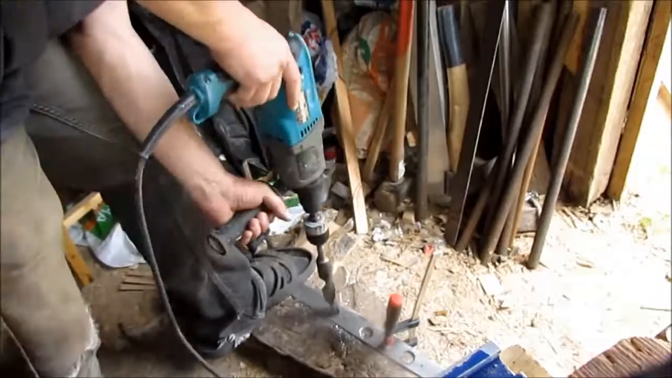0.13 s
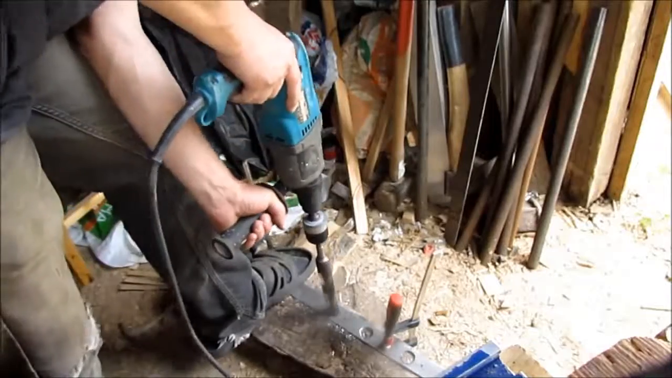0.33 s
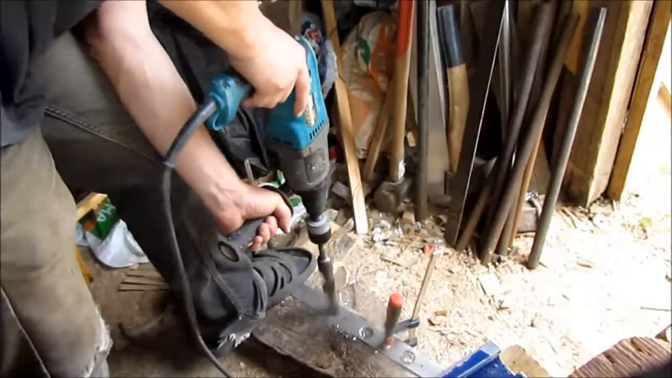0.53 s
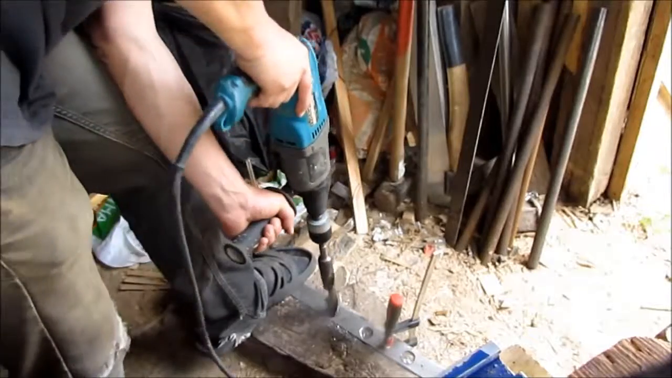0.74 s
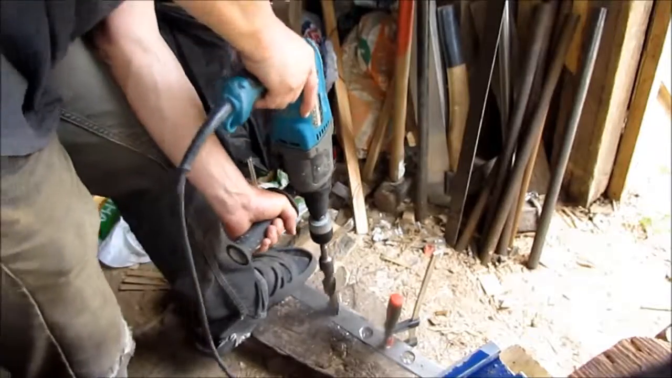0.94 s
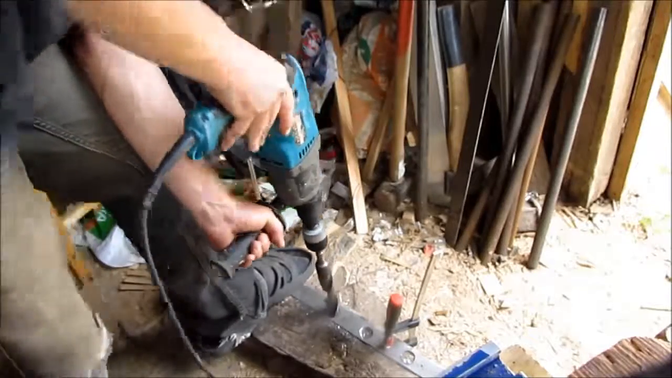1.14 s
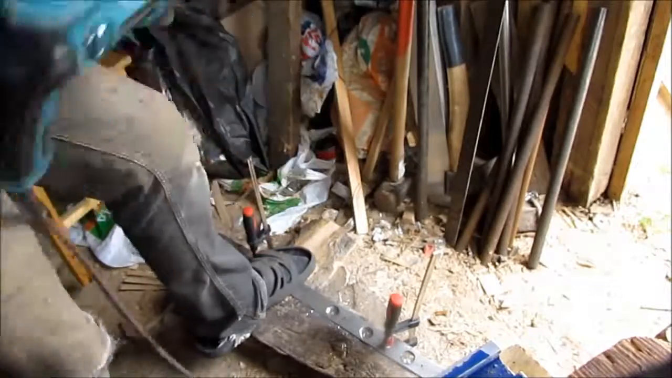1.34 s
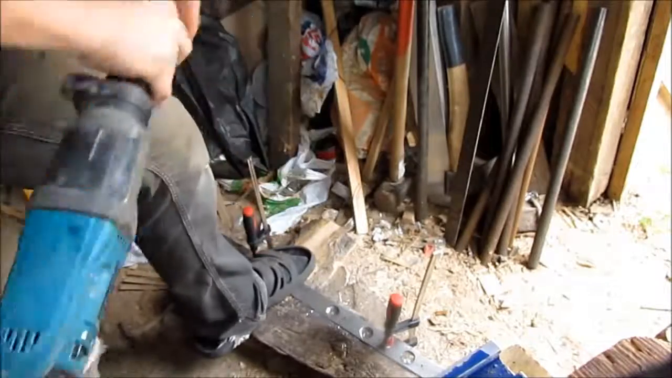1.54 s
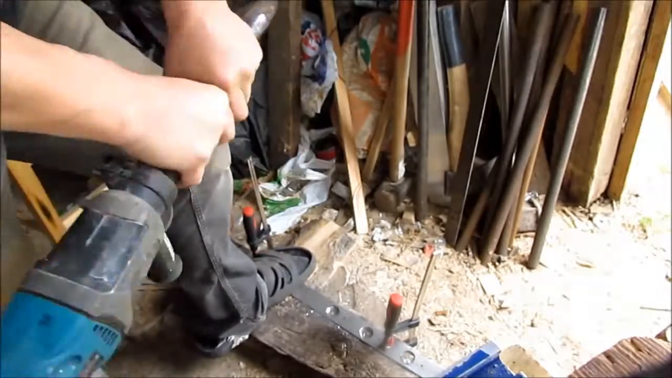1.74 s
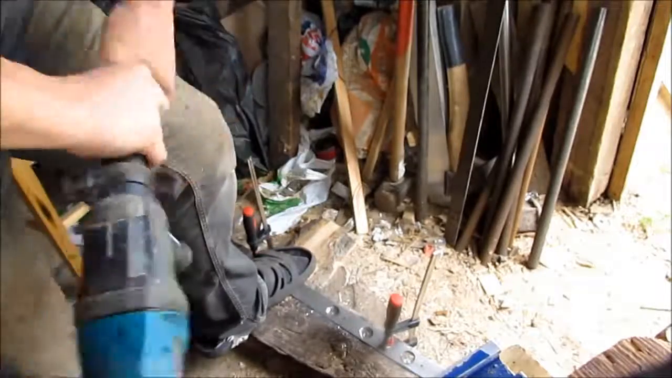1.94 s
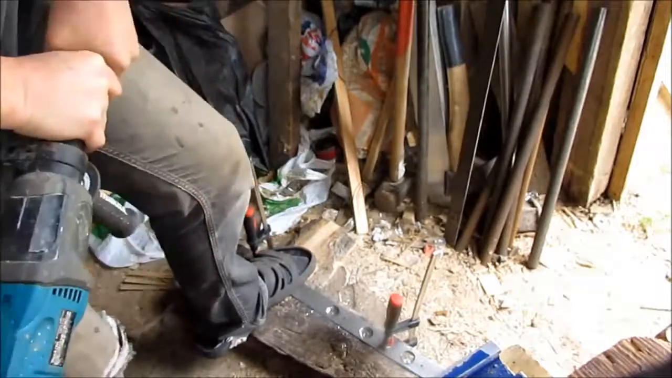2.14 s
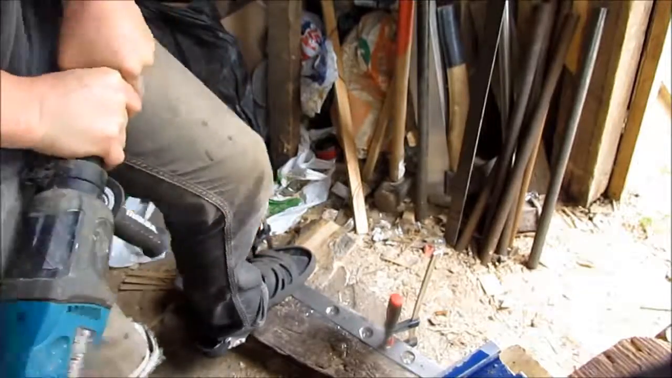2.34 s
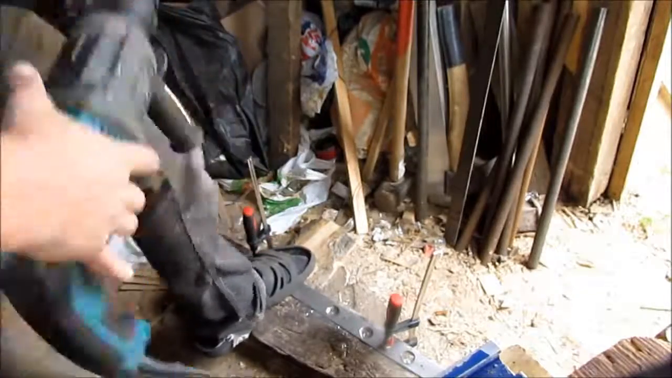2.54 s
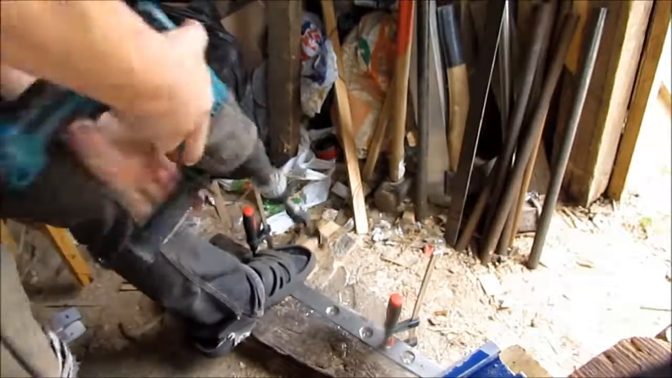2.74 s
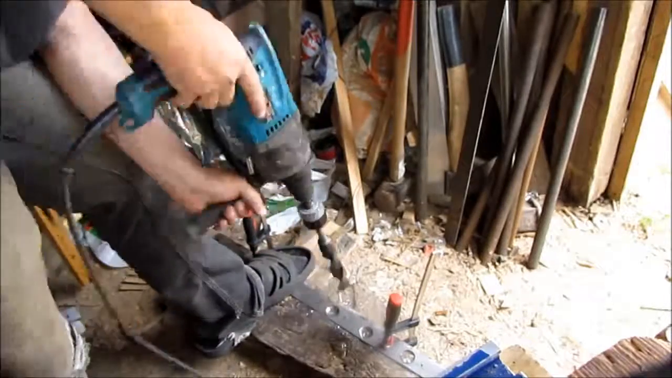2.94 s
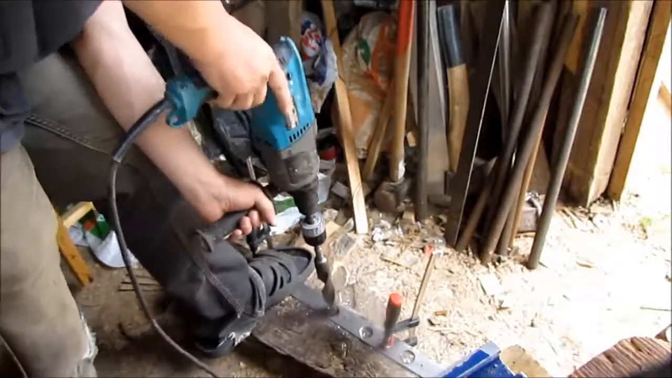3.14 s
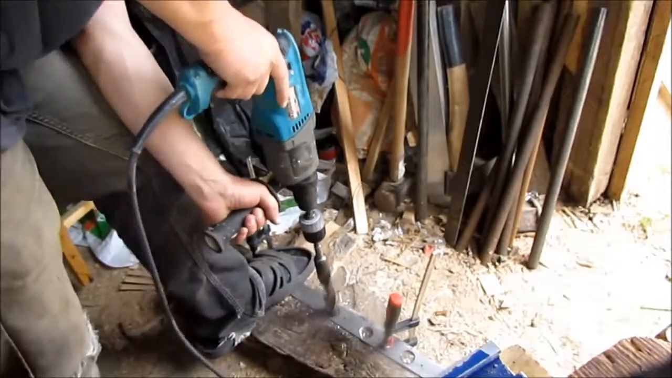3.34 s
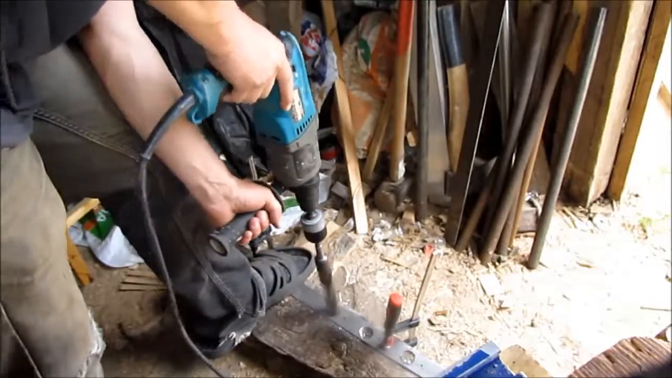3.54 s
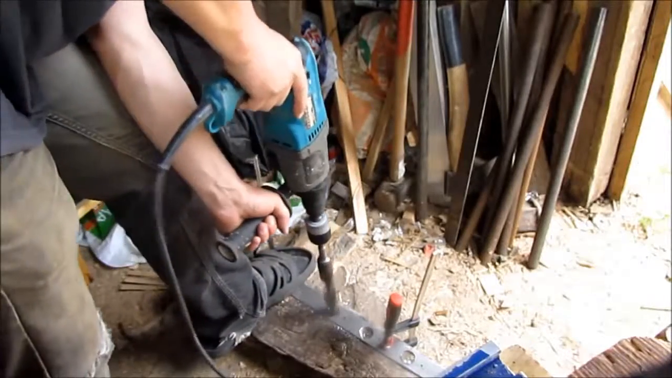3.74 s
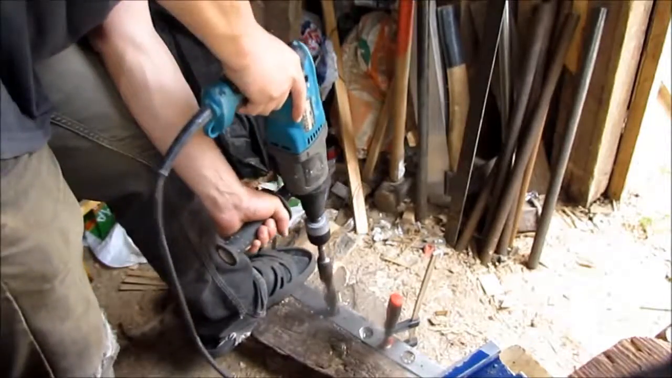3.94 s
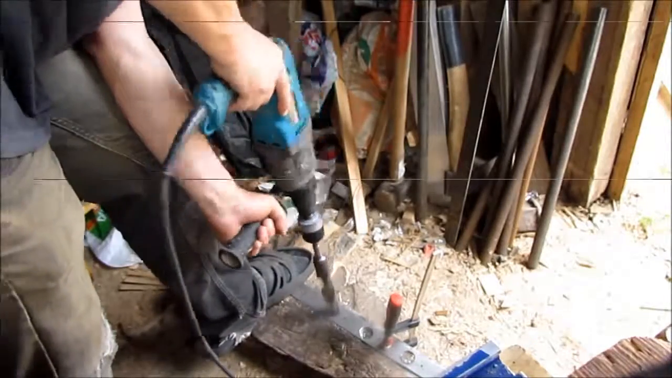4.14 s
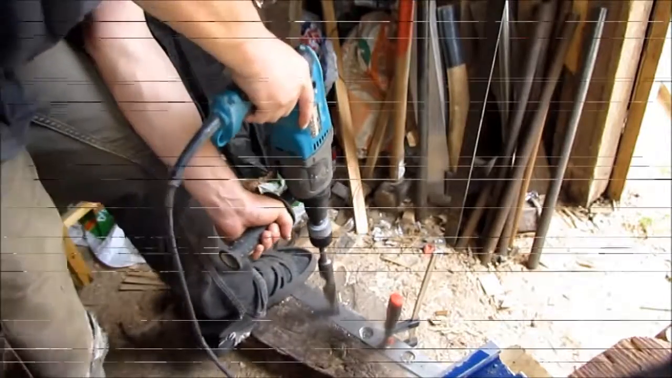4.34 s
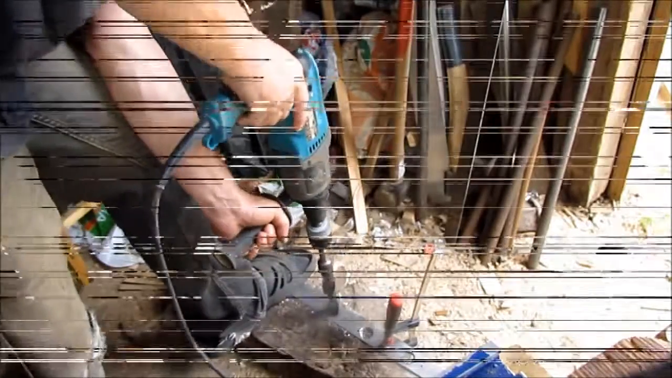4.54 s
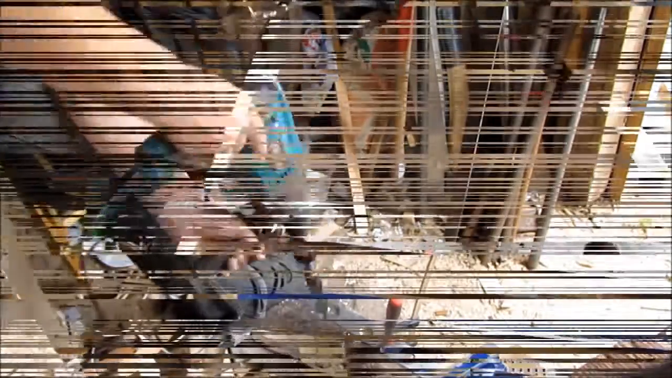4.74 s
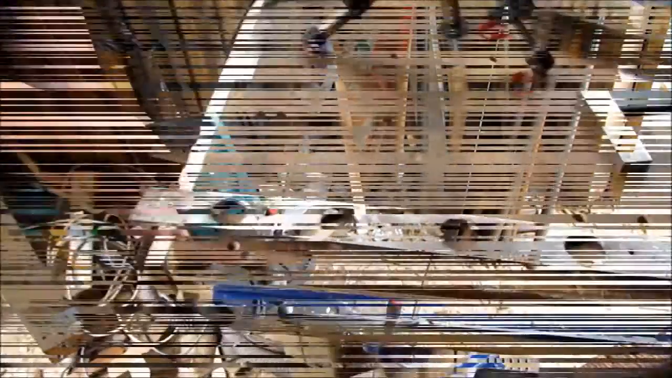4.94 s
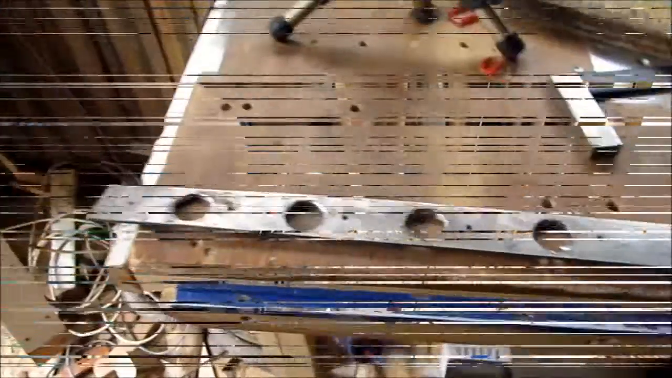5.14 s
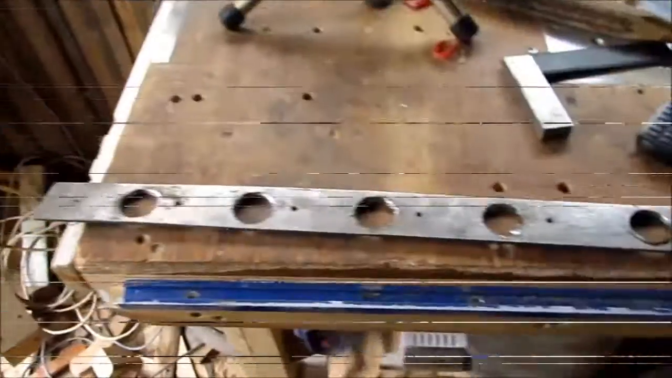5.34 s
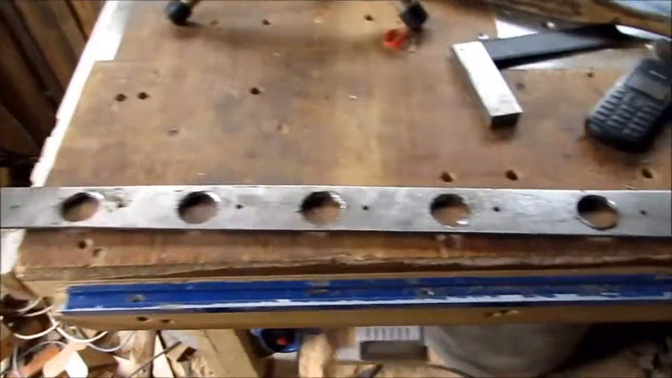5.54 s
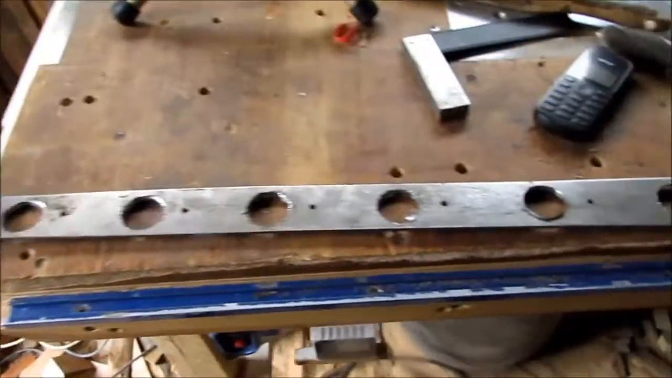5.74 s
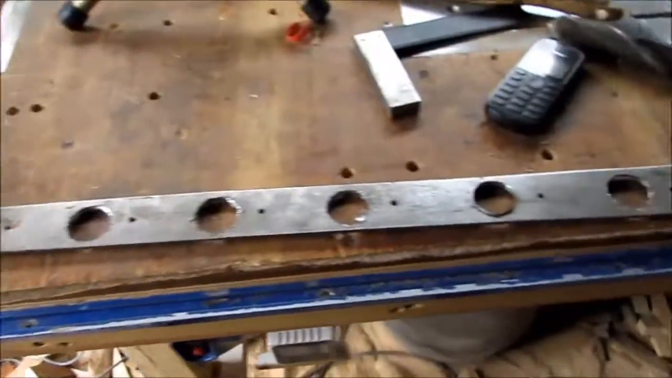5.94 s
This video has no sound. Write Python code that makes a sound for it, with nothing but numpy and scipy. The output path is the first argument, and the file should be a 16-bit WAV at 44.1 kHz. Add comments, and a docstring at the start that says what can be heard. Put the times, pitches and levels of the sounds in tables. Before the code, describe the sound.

Close stereo microphones in a small wooden shed. The bit knocks on a steel bar, then a corded drill cuts in harshly, chattering and whining, before spinning down. Quiet cloth rustle and hard little clicks follow as the chuck is handled, with one metallic clank. More knocks, then a longer drilling burst ends in clatter, a squeak and a falling whine, leaving a soft distant engine throb.

```python
"""A corded drill bites into a steel bar in two bursts inside a wooden shed; between them the chuck is handled.
Chattering blows and chips ring the bar's modes; whirr and gear whine follow the motor up and down to a stop.
Knocks, clicks, a clank and squeaks are short grit or tones; hands and cloth are clumped hiss over dull air.
During the second burst the shed's air is cross-faded into a second scene with a distant engine:
wavering firing orders over a rumble."""
import sys
import numpy as np
from scipy import signal
from scipy.fft import rfft, irfft, next_fast_len
from scipy.io import wavfile
from scipy.ndimage import uniform_filter1d

SR = 44100
rng = np.random.default_rng(int(sys.argv[2]) if len(sys.argv) > 2 else 0)


def int16_out(signal):
    """Quantize to a 16-bit WAV file."""
    q = np.round(np.clip(np.atleast_2d(signal).T, -1, 1) * 32767)
    wavfile.write(sys.argv[1], SR, q.astype(np.int16))


def convert_level_to_amplitude(level_db):
    """Map a level in decibels to its linear amplitude factor."""
    exponent = np.asarray(level_db, float) / 20
    return 10 ** exponent


N = 264889
T = np.arange(N) / SR


def evened(x):
    """Scales to unit rms."""
    return x / np.sqrt(np.mean(x ** 2) + 1e-20)


def coloured(x, points):
    """Filters by a spectrum given on a log-frequency axis."""
    f, db = np.transpose(points)
    size = next_fast_len(len(x))
    hz = np.fft.rfftfreq(size, 1 / SR)
    gain = convert_level_to_amplitude(np.interp(np.log(hz + 1), np.log(f + 1), db))
    return irfft(rfft(x, size) * gain, size)[:len(x)]


def wandering(shape, span):
    """Slow random motion of unit rms: noise averaged over span samples."""
    return evened(uniform_filter1d(rng.standard_normal(shape), span))


def fading(x, tau):
    """Lets every impulse die away exponentially over tau seconds."""
    return signal.lfilter([1], [1, -np.exp(-1 / (tau * SR))], x)


def add(mix, s, sound):
    """Places a sound at s seconds, cut off at the end of the mix."""
    part = mix[round(s * SR):][:len(sound)]
    part += sound[:len(part)]


def shifting(x, patchy_db):
    """The contact wanders, so bands of the sound swell and fade in patches."""
    z = signal.stft(x, nperseg=512)[2]
    patches = uniform_filter1d(rng.standard_normal(z.shape), 5, axis=0)
    patches = evened(uniform_filter1d(patches, 10, axis=1))
    return signal.istft(z * convert_level_to_amplitude(patchy_db * patches), nperseg=512)[1][:N]


# the bit bites, close to the microphones: start t/s, end t/s, cutting level/dB before the surge, swell t/s, fade t/s
BITES = [(.217, 0.789, -22.5, .02, 0.037), (0.814, 0.999, -22, 0.031, 0.036),
         (1.032, 1.094, -22.5, 0.021, .022), (3.341, 4.141, -23, 0.016, 0.016),
         (4.148, 4.441, -22.5, 0.058, 0.005)]
DIP_DB, DIP_S, RETURN_S = -32.5, 0.042, .85  # full depth, time constants down and back


def background_dip():
    """Background gain in dB: turned down quickly during each bite and slowly up again after it."""
    dips = []
    for start, end, *_ in BITES:
        down = 1 - np.exp(-np.clip(T - start, 0, end - start) / DIP_S)
        back = np.exp(-np.maximum(T - end, 0) / RETURN_S)
        dips.append(DIP_DB * down * back)
    return np.min(dips, axis=0)


# hands and cloth near the microphones: f/Hz, density level/dB
RUSTLE_COLOUR = [(1180, -38), (2000, -8.5), (3010, -2), (6470, -3), (11400, -2.5), (16000, -7)]
# their strokes: start t/s, peak level/dB of the hiss, swell t/s, decay t/s
STROKES = [(0, -53, 0.0054, 0.13), (1.7, -67, .04, 0.12), (1.82, -65, 0.14, 0.14), (1.96, -58, 0.043, 0.14),
           (2.2, -56, 0.16, .03), (2.424, -44, .006, 0.048), (2.47, -53.5, 0.1, 0.17),
           (2.87, -48.5, 0.027, 0.019), (5.1, -57, 0.02, 0.024), (5.29, -54.5, 0.039, 0.018),
           (5.36, -63, 0.02, 0.11)]
# the cloth hiss between the strokes is fainter in the second scene: t/s, gain level/dB
CLOTH_HISS_GAIN = [(4.5, 2.5), (4.9, -11)]
STROKE_BODY_DB = -3.5  # body of a stroke against its hiss
HISS_DB, BODY_DB = -57.5, -57.5  # restless cloth between the strokes, before the gains over time
DIP_SHARE = 0.64  # part of the background dip which this cloth follows


def rustle():
    """Cloth and skin: hiss in clumps with fine crackle, over a duller body."""
    clumps = convert_level_to_amplitude(1.6 * wandering(N, 900))
    crackle = fading((rng.random(N) < 50 / SR) * np.minimum(rng.exponential(1.2, N), 3), 0.0022)
    hiss = shifting(coloured(rng.standard_normal(N), RUSTLE_COLOUR), patchy_db=2.2)
    hiss = evened(hiss * (clumps + crackle))
    dull = [(300, -1.5), (600, -6), (1500, -7), (3000, -12.0), (5000, -22.5)]
    body = evened(coloured(rng.standard_normal(N), dull) * clumps)
    strokes = np.zeros(N)
    for s, db, swell, decay in STROKES:
        rise = np.clip((T - s) / swell, 0, 1)
        strokes += convert_level_to_amplitude(db) * rise * np.exp(-np.maximum(T - s - swell, 0) / decay)
    bed = convert_level_to_amplitude(DIP_SHARE * background_dip())
    hiss_bed = bed * convert_level_to_amplitude(np.interp(T, *np.transpose(CLOTH_HISS_GAIN)))
    hiss_gain = strokes + convert_level_to_amplitude(HISS_DB) * hiss_bed
    body_gain = convert_level_to_amplitude(STROKE_BODY_DB) * strokes + convert_level_to_amplitude(BODY_DB) * bed
    return hiss * hiss_gain + body * body_gain


# low air inside the shed before the background dip, faded out at the cross-fade: t/s, level/dB
AIR_LEVEL = [(0, -46), (.25, -49.5), (3.3, -52), (4.1, -51.5), (4.2, -90)]
# colour of that air: f/Hz, density level/dB
AIR_COLOUR = [(15, -65), (25, -48), (218, 8), (270, -1.5), (306, 1.5), (348, -6.5), (387, -8.5),
              (1010, -13), (4000, -22), (5200, -34), (8800, -120)]


def air():
    """The dull wash of the shed: coloured noise, turned down with the background and faded out at the cross-fade."""
    wash = evened(coloured(rng.standard_normal(N), AIR_COLOUR))
    return wash * convert_level_to_amplitude(np.interp(T, *np.transpose(AIR_LEVEL)) + background_dip())


# modes of bar and bit, close up: f/Hz, width f/Hz, level/dB over the crack at ring 1
BAR_MODES = [(844, 11, -12.5), (1119, 7, 9), (1458, 16.6, 15.5), (1550, 89, 12.5), (2162, 7.5, 5.5),
             (2452, 47, 9), (2676, 130, 8), (2904, 70, 12), (3223, 76, 5.5), (3400, 160, 9.5),
             (3627, 91, 7), (4062, 162, 12), (4504, 77, 8), (4950, 200, 5.5), (5600, 100, 5),
             (6980, 840, 1.5), (7810, 140, 4.5), (8520, 140, 4), (11040, 970, 2.5), (13400, 590, 9)]
# broad crack of each contact: f/Hz, density level/dB
CRACK = [(100, -107.5), (230, -33), (330, -20), (480, -29), (570, -32), (700, -12), (1300, -13.5),
         (2050, -9), (2500, -6.5), (4200, -7.5), (6000, -5.5), (11000, -8), (15500, -16.5)]


def steel(force, ring):
    """The bar rings in its modes over the broad crack of the contact; a causal response."""
    hz = np.fft.rfftfreq(8192, 1 / SR)
    f, db = np.transpose(CRACK)
    modes = 1 + sum(convert_level_to_amplitude(2 * ring * peak_db) / (1 + (2 * (hz - mode_hz) / width) ** 2)
                    for mode_hz, width, peak_db in BAR_MODES)
    log_gain = np.interp(np.log(hz + 1), np.log(f), db) * np.log(10) / 20 + np.log(modes) / 2
    # folding the cepstrum forward gives minimum phase: the ring follows the blow
    cepstrum = irfft(log_gain)
    cepstrum[1:4096] *= 2
    cepstrum[4097:] = 0
    response = irfft(np.exp(rfft(cepstrum)))[:4096]
    return signal.oaconvolve(force, response / np.linalg.norm(response))[:len(force)]


# the bit knocks the bar, close up: t/s, peak level/dB of the ring, scrape t/s, tilt level/dB per octave
KNOCKS = [(0.0305, -16.5, 0.0063, -6.5), (0.0459, -19, 0.0033, -4.5), (0.0761, -30, 0.0063, -3),
          (0.0992, -25, 0.0027, -10.5), (0.121, -11.5, 0.0042, -3), (0.149, -22.5, 0.0026, -6.5),
          (0.1945, -25, 0.0021, -3), (0.777, -13, 0.003, -0.5), (1.0254, -14.5, 0.005, 1.5),
          (1.103, -15, 0.002, 2), (1.204, -31, 0.0042, -2.5), (3.1845, -14.5, 0.0043, -4),
          (3.2034, -20.5, 0.004, -4.5), (4.1477, -19, 0.004, -2.5), (4.4453, -9, 0.0032, 0),
          (4.4578, -23.5, 0.004, -4), (4.5284, -22, 0.0027, -2.5), (4.5439, -13, 0.0058, 0.5),
          (4.569, -15, 0.0069, 1), (4.582, -19, 0.004, -3.5), (4.754, -40, 0.0048, -11.5)]
THUD_DB, THUD_PER_TILT = -34, -3  # the bench thuds below each knock, more under the dull ones


def knocks():
    """Each knock is a short scrape on the same bar, which rings freer than under the cut, and a dull thud."""
    out, t = np.zeros(N), np.arange(4000) / SR
    bench = [(80, -16.5), (230, -1), (480, -2), (1200, -12), (4000, -48)]
    for (s, db, length, tilt_db), grit in zip(KNOCKS, rng.standard_normal((len(KNOCKS), 4000))):
        force = grit * np.exp(-(t / (2 * length)) ** 2) * np.minimum(t / .0007, 1)  # ends abruptly
        hit = coloured(steel(force, ring=1.25), [(500, -2 * tilt_db), (16000, 3 * tilt_db)])
        thud = coloured(grit, bench) * np.exp(-t / 0.019) * np.minimum(t / 0.0046, 1)
        thud_db = db + THUD_DB + THUD_PER_TILT * tilt_db
        add(out, s, convert_level_to_amplitude(db) * hit / abs(hit).max() + convert_level_to_amplitude(thud_db) * thud / abs(thud).max())
    return out


# the drill in hand, one table a pull of the trigger, from pull to release: t/s, gear mesh f/Hz
MOTOR_RUNS = [
    [(.21, 2500), (.25, 5070), (.8, 5500), (1.0, 6440), (1.047, 6540)],
    [(3.33, 2500), (3.37, 5060), (4.15, 5470), (4.5, 6240), (4.545, 6570)],
]
# whirr, one row a run: level/dB at release speed, level/dB lost per tenfold slowing
WHIRR_LEVEL = [(-36, 15.5), (-32, 29.5)]
# gear whine: multiple of the mesh, relative level/dB before the housing
MESH_LINES = [(1, -2), (2, 0), (3, -3), (4, -3), (5, -3), (6, -8)]
# fan and brushes: f/Hz, density level/dB
WHIRR_COLOUR = [(200, -27.5), (350, -20.5), (570, -31.5), (900, -13), (1500, -31), (2000, -14),
                (3900, -12.5), (5300, -4), (7800, -4), (10500, -5.5), (16000, -8)]
# the housing around the gears: f/Hz, gain level/dB
HOUSING = [(1000, -10), (2000, -1), (2900, -6), (3500, 8), (4200, 0), (5300, 3), (6500, -2), (8200, 4),
           (11500, -3), (14000, -4)]
WHINE_DB, BIT_RING_DB = -10.5, -5  # gains of the gear whine and of the loose bit ringing along with the whirr
COAST_S, DRAG_HZ = .29, 2000  # after release the speed decays, and dry friction pulls it on to a stop
STOP_HZ = 705  # below this mesh rate the motor fades further, in proportion to its speed


def motor():
    """Fan and brush whirr, with the gear mesh whining roughly on its multiples through the housing."""
    whirr = evened(coloured(rng.standard_normal(N), WHIRR_COLOUR))
    whirr = evened(whirr + convert_level_to_amplitude(BIT_RING_DB) * steel(rng.standard_normal(N), ring=.75))
    whirr = shifting(whirr, patchy_db=2.5)
    out = np.zeros(N)
    lines = (len(MESH_LINES), N)
    for rows, (top_db, slope_db) in zip(MOTOR_RUNS, WHIRR_LEVEL):
        release, top_hz = rows[-1]
        coasting = (top_hz + DRAG_HZ) * np.exp(-np.maximum(T - release, 0) / COAST_S) - DRAG_HZ
        hz = np.maximum(np.minimum(np.interp(T, *np.transpose(rows)), coasting), 1)
        turn = 2 * np.pi * np.cumsum(hz) / SR
        slip = .6 * wandering(lines, 150)  # radians
        waver = convert_level_to_amplitude(5 * wandering(lines, 500))  # each line comes and goes
        audible = hz * np.array(MESH_LINES)[:, :1] < SR / 2
        whine = sum(convert_level_to_amplitude(db) * a * w * np.sin(k * turn + p)
                    for (k, db), a, w, p in zip(MESH_LINES, audible, waver, slip))
        whine = coloured(whine, HOUSING)
        gain = np.clip((T - rows[0][0]) / .03, 0, 1) * convert_level_to_amplitude(top_db + slope_db * np.log10(hz / top_hz))
        gain = gain * np.minimum(hz / STOP_HZ, 1)
        out += gain * (whirr + convert_level_to_amplitude(WHINE_DB) * whine)
    return out


# growl of the bar's middle modes, one value a run: level/dB before the surge
GROWL_DB = [-0.5, 1.9]
# the first bite of a run starts hard and settles; the growl takes a share of the surge
SURGE_DB, SURGE_S, SURGE_GROWL = 11, 0.044, 0.69


def biting():
    """Gain of the cut and the growl in dB, from the bites and the pulls of the trigger."""
    surge_db = sum(SURGE_DB * (T > run[0][0]) * np.exp(-np.abs(T - run[0][0]) / SURGE_S)
                   for run in MOTOR_RUNS)
    gain = np.zeros(N)
    for start, end, db, swell, fade in BITES:
        shape = np.clip(np.minimum((T - start) / swell, (end - T) / fade), 0, 1)
        gain += shape * convert_level_to_amplitude(db + surge_db)
    second_pull = MOTOR_RUNS[1][0][0]
    return gain, SURGE_GROWL * surge_db + np.where(T < second_pull, *GROWL_DB)


# the modes that swell as the bit digs in, close up: f/Hz, level/dB
GROWL_BAND = [(1900, -42.5), (2400, -6.5), (3100, -8), (3700, -49)]
# low thump of each blow in the bench: f/Hz, level/dB
BENCH_THUMP = [(200, -51.5), (290, -2.5), (420, 1), (560, -4.5), (700, -2), (1000, -28)]
CHATTER_PER_S, CHATTER_SAG_PER_S2 = 98, 11  # blows a second at the pull, slowing as the hole deepens


def cutting():
    """Nearly even blows, strong and weak in turn, each a swelling and dying burst of grit,
    over steady scraping and stray chips."""
    wobble = 1 + .025 * wandering(N, 1500)
    since = np.min([np.where(T > run[0][0], T - run[0][0], T[-1]) for run in MOTOR_RUNS], axis=0)
    turns = np.floor(np.cumsum((CHATTER_PER_S - CHATTER_SAG_PER_S2 * since) * wobble) / SR)
    strength_db = 1.1 * rng.standard_normal(N) + 0.5 * (turns % 2)
    blows = (np.diff(turns, prepend=0) > 0) * convert_level_to_amplitude(strength_db)
    chips = (rng.random(N) < 250 / SR) * convert_level_to_amplitude(5.3 * np.minimum(rng.exponential(1, N), 3))
    grit = .45 + uniform_filter1d(fading(blows, .004), size=90) + .22 * fading(chips, .0006)
    force = evened(grit * rng.standard_normal(N))
    gain, growl_db = biting()
    cut = steel(force * gain, ring=1)
    cut = cut + (convert_level_to_amplitude(growl_db) - 1) * coloured(cut, GROWL_BAND)
    thumps = evened(coloured(blows, BENCH_THUMP)) * convert_level_to_amplitude(-34)  # hums on multiples of the blow rate
    return shifting(cut, patchy_db=1.3) + thumps * uniform_filter1d(gain, size=1300)


# hands on chuck and tools click beside the drill: t/s, peak level/dB, centre f/Hz
CLICKS = [(1.4197, -39, 8720), (1.4424, -38.5, 5150), (1.4523, -44, 6440), (1.4815, -39, 3420),
          (1.513, -43.5, 3490), (1.7073, -40.5, 7850), (1.7554, -36, 7610), (2.0358, -29.5, 6800),
          (2.062, -29.5, 7350), (2.2197, -38.5, 9840), (2.2593, -37, 11400), (2.295, -41, 4000),
          (2.3331, -37, 3040), (2.355, -31, 9680), (2.367, -28, 6690), (2.391, -31.5, 6030),
          (2.4004, -34, 3660), (2.4384, -21.5, 2930), (2.614, -24, 9770), (2.6903, -38, 5560),
          (2.717, -27, 8020), (2.7733, -32.5, 4050), (2.8865, -23, 9770), (2.905, -36.5, 9700),
          (5.036, -38, 4050), (5.1097, -38, 5500), (5.5684, -43.5, 3290)]
CLICK_S = .0032  # decay time constant


def clicks():
    """Small hard parts: a dying puff around a broad resonance."""
    out, t = np.zeros(N), np.arange(3000) / SR
    for (s, db, hz), grit in zip(CLICKS, rng.standard_normal((len(CLICKS), 3000))):
        puff = coloured(grit, [(200, -22), (hz * 0.58, -9), (hz, 0), (hz * 1.3, -8), (20000, -12)])
        puff = puff * np.exp(-t / CLICK_S) * np.minimum(t / (0.33 * CLICK_S), 1)
        add(out, s, convert_level_to_amplitude(db) * puff / abs(puff).max())
    return out


# a loose metal part in the shed: f/Hz, relative level/dB, t60 t/s
CLANK_MODES = [(904, 2, 0.03), (1220, 3, 0.04), (2950, 0, 0.07), (4000, 2, 0.025), (4900, -10, 0.06),
               (7600, 0, .015), (11200, 0, 0.03), (11800, 2, .02)]
CLANK_S, CLANK_DB = 2.438, -30  # start, peak


def clank():
    """A rattling touch sets a small metal part ringing."""
    out, t = np.zeros(N), np.arange(9000) / SR
    ring = sum(convert_level_to_amplitude(db - 60 * t / t60) * np.sin(2 * np.pi * hz * t) for hz, db, t60 in CLANK_MODES)
    rattle = rng.standard_normal(2600) * np.exp(-t[:2600] / 0.024)
    hit = signal.oaconvolve(rattle, ring)
    add(out, CLANK_S, convert_level_to_amplitude(CLANK_DB) * hit / abs(hit).max())
    return out


# the bit squeaks close up, and one small ping comes near the end:
# t/s, length t/s, start f/Hz, end f/Hz, level/dB before the flutter
SQUEAKS = [(3.361, 0.0084, 6530, 7300, -18), (4.68, 0.025, 6430, 7750, -25), (4.69, 0.018, 6500, 5600, -32),
           (4.722, 0.012, 6540, 6240, -37), (5.979, 0.065, 660, 656, -41.5)]


def squeaks():
    """Stick-slip tones: a wavering glide with its octave."""
    out = np.zeros(N)
    for s, length, hz0, hz1, db in SQUEAKS:
        count = int(length * SR)
        turn = 2 * np.pi * np.cumsum(np.linspace(hz0, hz1, count)) / SR
        flutter = 1 + 0.79 * np.sin(2 * np.pi * 0.041 * hz0 * np.arange(count) / SR)
        tone = np.sin(turn) + 0.12 * np.sin(2 * turn)
        add(out, s, convert_level_to_amplitude(db) * np.hanning(count) ** 0.7 * flutter * tone)
    return out


# distant engine of the second scene: order of the base rate, relative level/dB
ENGINE_ORDERS = [(1, -54), (2, -49), (3, -61), (4, -60), (5, -55), (6, -60), (7, -56), (8, -58), (9, -62),
                 (10, -64), (12, -66)]
# its rumble: f/Hz, density level/dB
RUMBLE_COLOUR = [(12, -33), (20, -16), (53, 9.5), (96, 5), (198, -1.5), (367, -10), (642, -7.5), (698, -11),
                 (976, -13), (2020, -22), (10200, -31.5), (16000, -63)]
# its cross-fade in and later loudness, orders and rumble together: t/s, level/dB
ENGINE_LEVEL = [(4.05, -90), (4.141, -47), (5.198, -43), (6.0, -44)]
RUMBLE_DB = -51.5  # on the same relative scale as the orders
ENGINE_HZ, ENGINE_EXCESS_HZ, ENGINE_SETTLE_S = 25.4, 5, .8  # idle, excess at first, time constant


def engine():
    """Wavering firing orders, loosely in step so that they throb, over a rumble; it slows towards idle."""
    settling = np.exp(-np.maximum(T - ENGINE_LEVEL[1][0], 0) / ENGINE_SETTLE_S)
    hz = (ENGINE_HZ + ENGINE_EXCESS_HZ * settling) * (1 + 0.0049 * wandering(N, 9000))
    turn = 2 * np.pi * np.cumsum(hz) / SR
    waver = 1 + .27 * wandering((len(ENGINE_ORDERS), N), 5000)
    lag = .4 * wandering((len(ENGINE_ORDERS), N), 6000)  # radians
    orders = sum(convert_level_to_amplitude(db) * w * np.cos(k * turn - 0.1166 * k ** 2 + p)
                 for (k, db), w, p in zip(ENGINE_ORDERS, waver, lag))
    rumble = convert_level_to_amplitude(RUMBLE_DB) * evened(coloured(rng.standard_normal(N), RUMBLE_COLOUR))
    both = orders + rumble
    fade_in = np.clip((T - ENGINE_LEVEL[0][0]) / .08, 0, 1)
    return both / np.std(both) * fade_in * convert_level_to_amplitude(np.interp(T, *np.transpose(ENGINE_LEVEL)))


def shed(x):
    """Short wooden echo: scattered reflections after 4 ms, falling 60 dB in 72 ms."""
    t = np.arange(12000) / SR
    taps = rng.standard_normal(12000) * convert_level_to_amplitude(-60 * t / 0.072) * (t > .004)
    return x + convert_level_to_amplitude(-12.5) * signal.oaconvolve(x, taps / np.linalg.norm(taps))[:N]


def spread(x, width, size):
    """Two close microphones: a copy with scattered phases is added left and taken away right."""
    z = signal.stft(x, nperseg=size)[2]
    copy = signal.istft(z * np.exp(2j * np.pi * rng.random(z.shape)), nperseg=size)[1][:N]
    side = coloured(copy * np.std(x) / np.std(copy), width)
    return np.array([x + side, x - side])


# the microphones lose the bass of near sounds: f/Hz, gain level/dB
LOW_CUT = [(30, -26.5), (70, -2), (160, 0.5)]
# stereo width of the close drill: f/Hz, side over mid level/dB
WIDTH_DRILL = [(60, -29), (150, -31), (380, -82), (950, -101), (2380, -16.5), (5980, -10.5), (15000, -3.5)]
# stereo width of hands, cloth and air: f/Hz, side over mid level/dB
WIDTH_SHED = [(60, -8.5), (180, -12), (550, -2), (1650, -4.5), (4970, -6), (15000, -1.5)]
# stereo width of the distant engine: f/Hz, side over mid level/dB
WIDTH_FAR = [(60, -16), (180, -15), (550, -13), (1650, -3), (4970, 2.5), (15000, 1)]


def scene():
    """Near sounds lean slightly right and lose their bass; the distant engine leans further right."""
    drill = coloured(shed(cutting() + knocks() + squeaks() + motor()), LOW_CUT)
    around = coloured(shed(clicks() + clank()) + rustle() + air(), LOW_CUT)
    lean = np.array([[-1], [1]])  # left, right
    near = spread(drill, WIDTH_DRILL, size=256) + spread(around, WIDTH_SHED, size=512)
    far = spread(engine(), WIDTH_FAR, size=2048)
    return near * convert_level_to_amplitude(.2 * lean) + far * convert_level_to_amplitude(.75 * lean)


def low_pass(x):
    """Removes everything above the highest recorded frequency."""
    return signal.sosfilt(signal.butter(12, 16810, fs=SR, output="sos"), x)


def record(dry):
    """Takes down the finished stereo mix."""
    return low_pass(dry)


dry = scene()
out = record(dry)
int16_out(out)
```